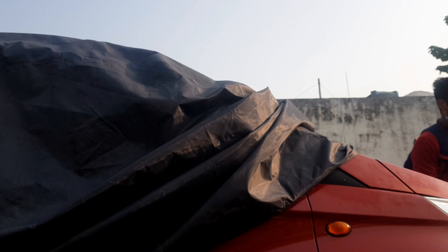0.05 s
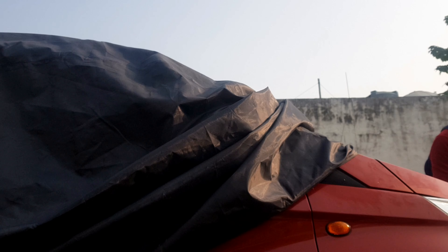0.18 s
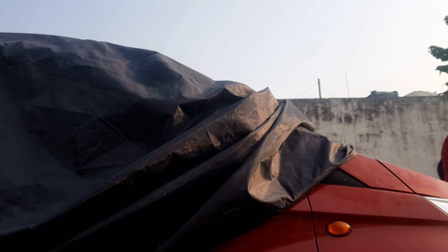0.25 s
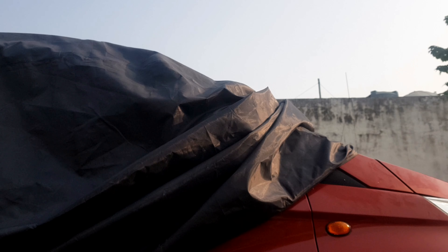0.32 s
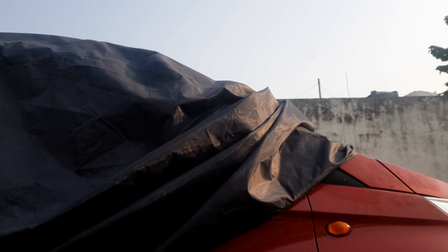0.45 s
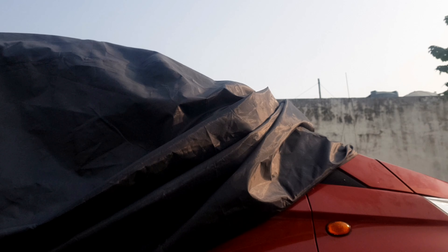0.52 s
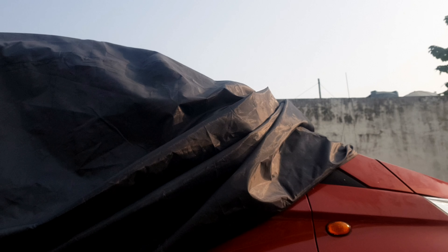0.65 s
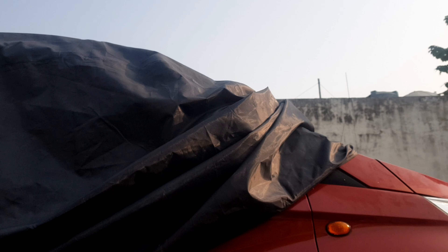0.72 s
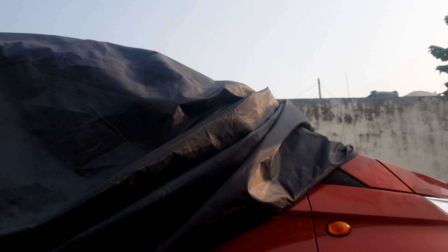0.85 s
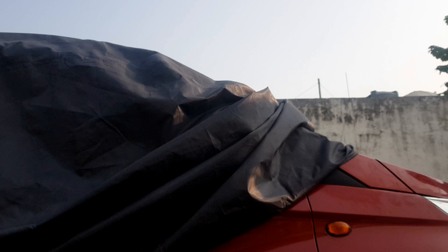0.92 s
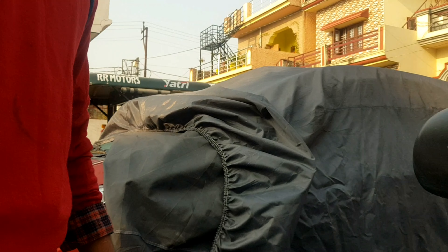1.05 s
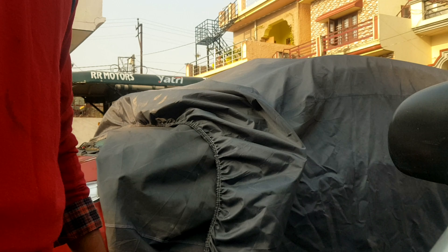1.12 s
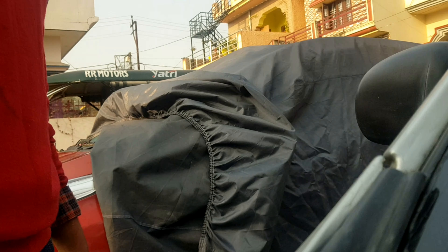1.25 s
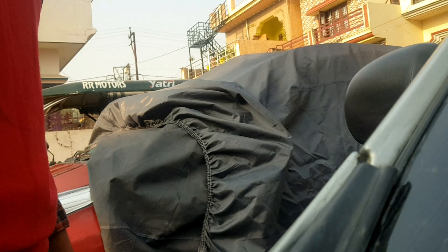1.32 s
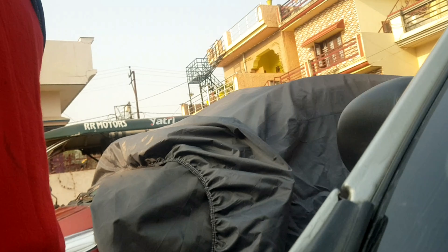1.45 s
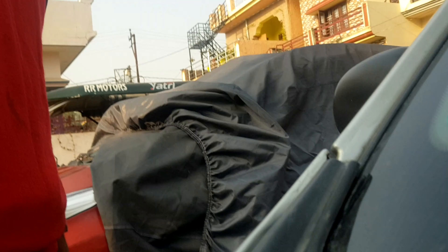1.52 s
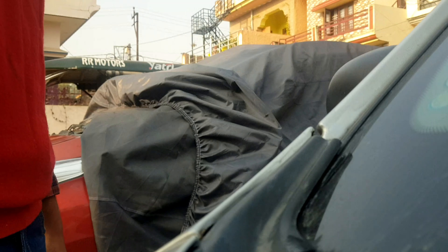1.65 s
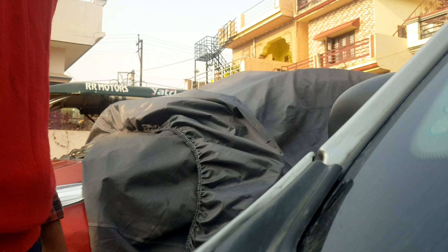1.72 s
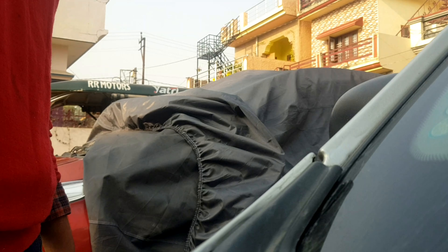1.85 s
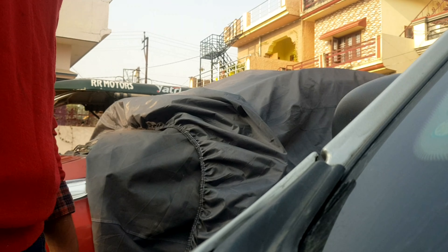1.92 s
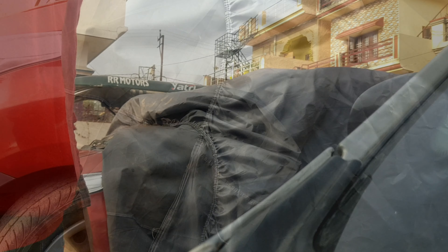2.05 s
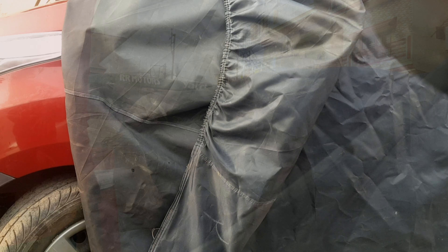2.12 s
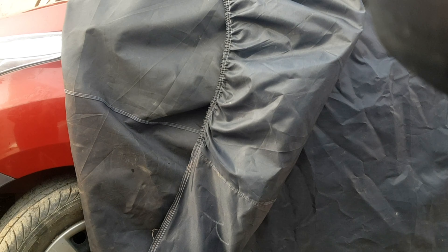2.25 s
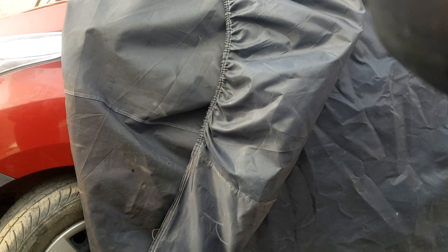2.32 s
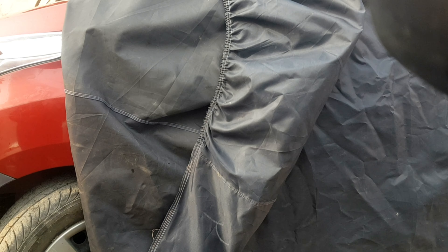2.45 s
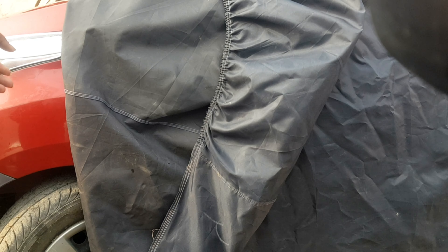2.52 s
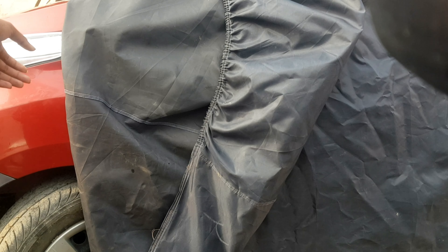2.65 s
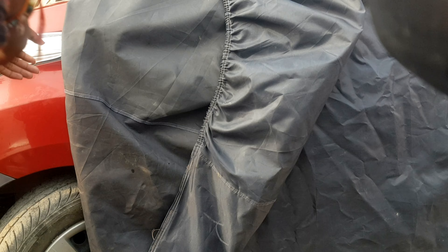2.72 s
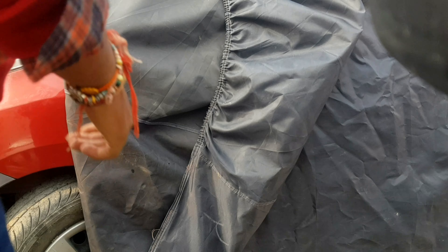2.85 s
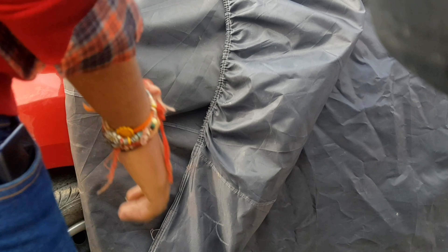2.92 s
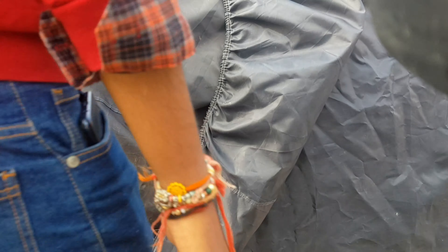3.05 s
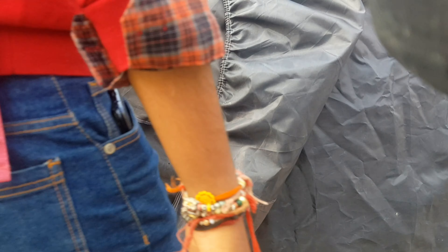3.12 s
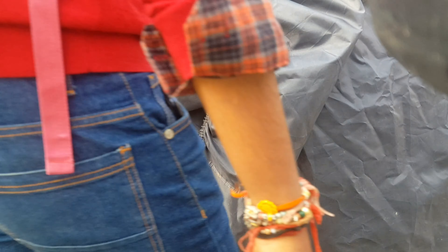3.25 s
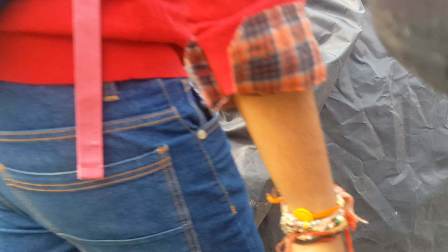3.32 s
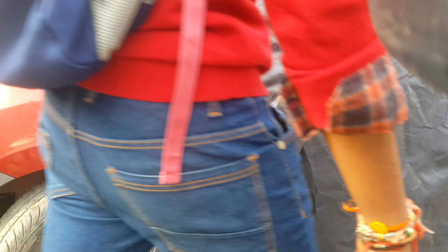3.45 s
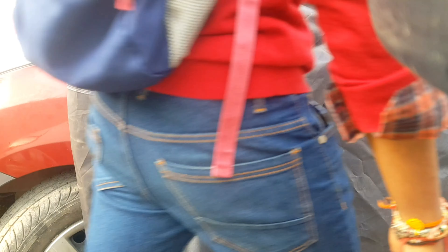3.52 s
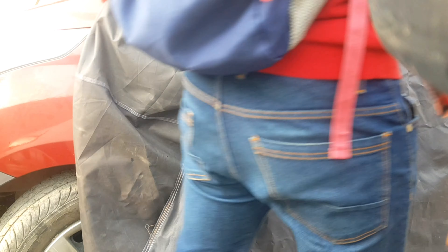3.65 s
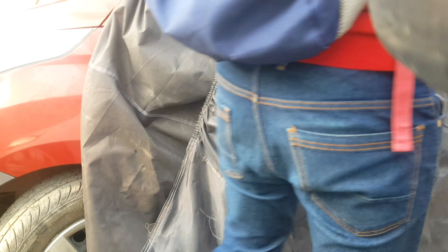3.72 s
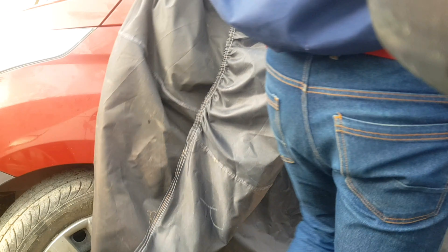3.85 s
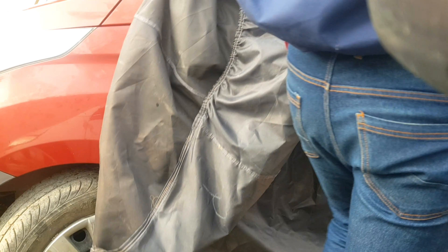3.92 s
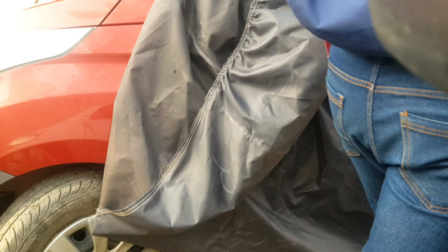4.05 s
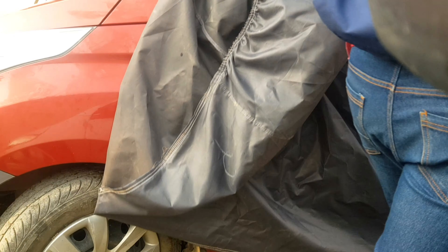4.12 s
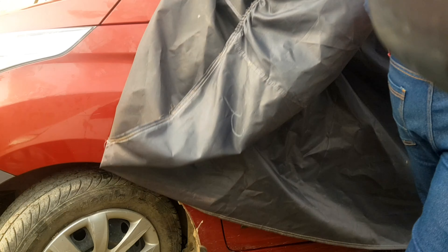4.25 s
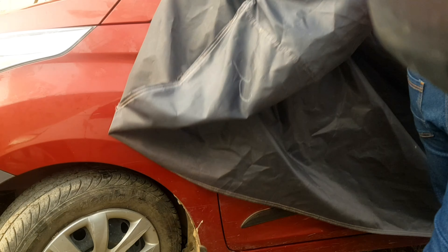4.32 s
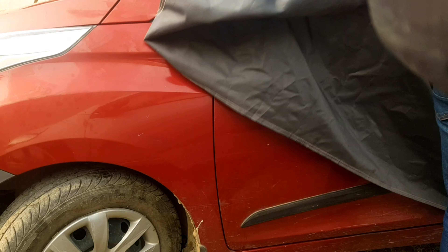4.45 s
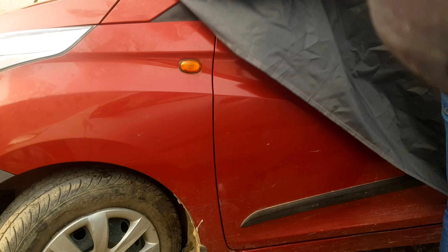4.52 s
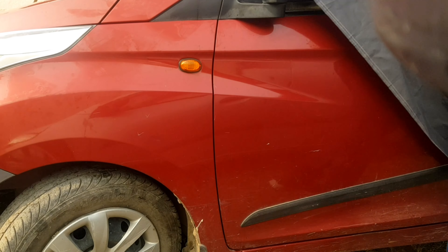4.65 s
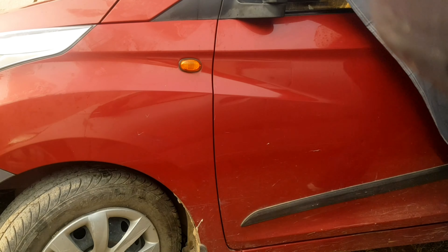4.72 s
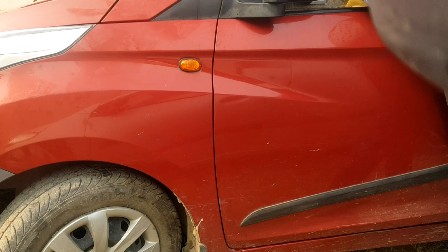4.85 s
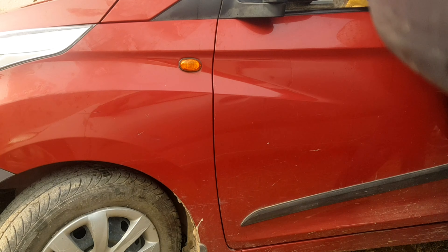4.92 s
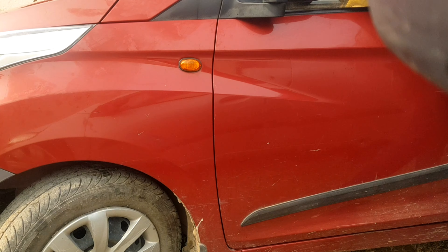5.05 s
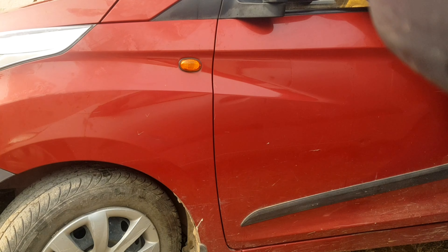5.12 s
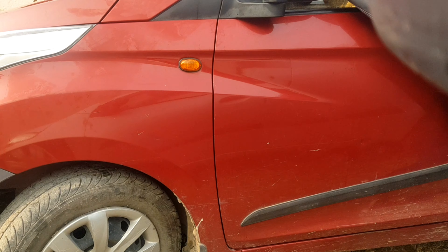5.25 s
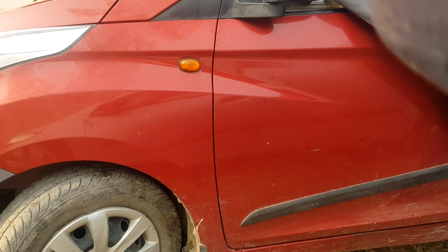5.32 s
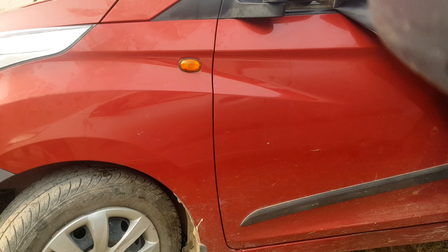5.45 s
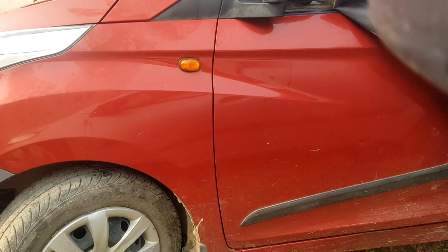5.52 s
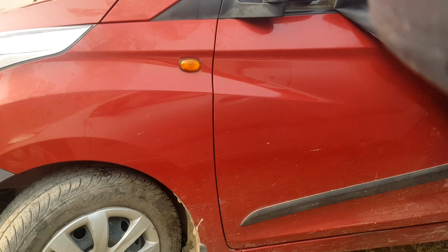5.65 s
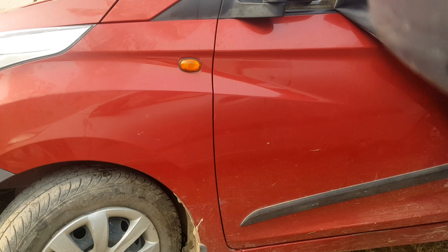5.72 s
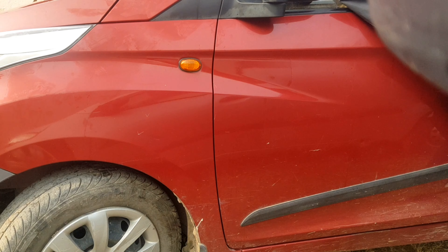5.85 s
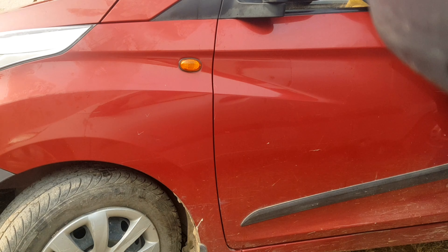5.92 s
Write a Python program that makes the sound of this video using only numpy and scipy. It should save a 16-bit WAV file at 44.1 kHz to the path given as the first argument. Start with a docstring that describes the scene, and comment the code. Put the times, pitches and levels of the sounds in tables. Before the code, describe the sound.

A stiff fabric cover rustles lightly in short tugs with a brief squeak, over soft outdoor rumble. Sharp bumps hit the camera body, ringing and clattering, then fade into a low hum. Quiet follows, with a few cloth pops and dull panel pats, before the cover is hauled off in a dense rush of hiss, crackle and snapping folds, then bundled more gently.

```python
"""A low street rumble and the hiss of cloth over paint come first, with a faint whine and far tones.
A synthetic cover is tugged, then dragged off a parked car and gathered up, close to a hand-held camera.
Shaped noise and clicks make the hiss and crackle; short damped tones make pops and squeaks of the folds.
Early on a run of hard bumps shakes the camera: pushed thuds, ringing modes, rattles and ticks.
Later, pats on the car's side set off a damped panel boom and puffs of air."""
import sys
import numpy as np
from scipy import signal
from scipy.fft import rfft, irfft, next_fast_len
from scipy.io import wavfile
from scipy.ndimage import uniform_filter1d

SR = 44100
rng = np.random.default_rng(int(sys.argv[2]) if len(sys.argv) > 2 else 0)


def digitize_waveform(pressure):
    """Quantize a signal to 16-bit integers and store it at the path in sys.argv[1].

    Rows of a 2-D input are taken as channels; values are limited to [-1, 1].
    """
    field = np.atleast_2d(pressure).T
    bounded = np.clip(field, -1, 1)
    quanta = np.round(bounded * 32767).astype(np.int16)
    wavfile.write(sys.argv[1], SR, quanta)


N = 264159  # samples

# Spectra, relative: (frequency [Hz], density [dB per Hz])
# cloth sliding, small creases, crushed large folds, billowing sheet
SLIDE_COLOUR = [(1200, 0.5), (2800, 0.5), (4500, -1), (6300, -0.5), (8200, -2.5), (10000, 0), (11600, 1),
                (13500, -2), (15500, -4.5)]
CREASE_COLOUR = [(500, -13), (1000, -2), (1400, 1), (1850, 3), (2400, -3.5), (3300, -8.5), (5000, -12),
                 (9000, -26)]
CRUSH_COLOUR = [(100, -43), (220, 0), (340, -1), (500, 0), (800, -3.3), (1100, -11), (1600, -22),
                (3000, -40), (8000, -66)]
BILLOW_COLOUR = [(40, -20), (100, 3), (160, 0), (240, -4.5), (400, -9.5), (1200, -49)]
# low rumble and far wash of the street
RUMBLE_COLOUR = [(15, -33), (30, -21.5), (50, 2), (65, 1), (95, -5.5), (130, -13), (220, -24.5), (600, -61),
                 (2000, -82)]
STREET_COLOUR = [(30, 2.5), (150, 7), (300, 1.5), (700, -1.5), (1200, -10.5), (1800, -10.5), (3000, -11),
                 (6500, -18), (8300, -35), (11500, -12), (15500, -13)]
# loose parts of the mount shaking after a bump, snap of the shell, blur around the hum
RATTLE_COLOUR = [(30, -20), (70, 19.5), (250, 13), (450, 1.5), (750, -14.5), (1000, -12.5), (1400, -26),
                 (2200, -22), (4000, -41.5), (8000, -69)]
TICK_COLOUR = [(400, -5), (1400, 18), (2500, 5), (4000, 0), (5500, -7.5), (8500, -7), (12000, 0),
               (15500, -7)]
HUM_COLOUR = [(150, -10), (300, 0), (360, -5), (470, -3), (700, -22), (2000, -60)]
# colour of a crumple around its pitch: (multiple of the pitch [ratio], density [dB per Hz])
CRUMPLE_COLOUR = [(.2, -22), (.45, -7), (.75, 0), (1.3, 0), (1.8, -10), (3.5, -17), (8, -32)]
# likeness of left and right, close by and spread out: (frequency [Hz], correlation [-1 to 1])
NEAR_LIKENESS = [(60, 0.95), (200, 0.85), (400, 0.78), (700, 0.42), (1000, 0.53), (1400, -0.34),
                 (2800, -0.013), (6000, 0.019)]
WIDE_LIKENESS = [(60, 1), (170, 0.61), (350, .5), (650, -0.2), (1200, -0.69), (1800, -0.48), (2600, 0.18),
                 (4000, -0.011)]

# puffs of air on the microphones:
# (peak time [s], rise over 20 dB [s], fall over 20 dB [s], level [dB])
GUSTS = [(0.15, .3, 0.1, -55), (0.5, 0.4, .5, -51), (0.88, 0.1, 0.2, -49.5), (1.19, 0.12, 0.32, -42.5),
         (1.87, 0.3, .15, -49), (3.26, 0.07, 0.2, -50), (3.8, 1.5, 2.5, -54.5), (4.84, .8, .35, -47.5),
         (5.14, 1.2, 0.1, -55), (5.26, .1, .08, -55), (5.93, .16, 3, -51)]
# partials of a faint far drone: (frequency [Hz], width [Hz], relative level [dB])
DRONE = [(520, 50, -15), (678, 49, -8), (960, 60, -11), (1195, 60, -8.5), (1400, 50, -11), (1540, 40, -15)]
# loudness of the drone: (time [s], level [dB])
DRONE_LEVEL = [(0, -65), (.2, -63), (.45, -68), (.7, -64), (.95, -72), (1.5, -77.5), (2.9, -88),
               (5.99, -73)]
# loudness of the whine: (time [s], level [dB])
WHINE_LEVEL = [(0, -79), (.9, -80), (1.2, -73), (1.3, -81), (1.5, -87), (2.1, -93), (2.4, -80), (2.88, -77),
               (3.05, -88), (5.99, -90)]
# far tones that come and go: (middle time [s], length [s], pitch [Hz], level [dB])
FAR_TONES = [(0.22, .13, 1185, -62), (0.52, .18, 1210, -67), (0.68, .34, 695, -61.5)]

# short tugs at the cover: (time up to speed [s], rise over 20 dB [s], hold [s], fall over 20 dB [s],
#  hiss [dB], crease [dB], crush [dB])
TUGS = [(0.135, .12, 0.042, .2, -63.5, -63, -61), (0.25, .1, .08, .28, -69, -71, -69),
        (0.49, .09, .02, .25, -65, -74, -66), (0.58, 0.12, 0.05, 0.26, -63, -65, -64.5),
        (0.68, 0.09, 0.028, 0.1249, -53.5, -59.5, -67), (0.75, 0.06, 0.037, 0.2152, -51.5, -56.5, -58.5),
        (0.92, 0.4, .25, .4, -67.5, -72, -76), (2.37, 0.17, 0.045, .5, -61.5, -73, -75),
        (2.88, 0.18, 0.11, 0.26, -64, -77, -83), (3.22, .13, 0.098, .14, -62.5, -79, -59.5),
        (3.43, .07, 0.083, 0.3, -65, -74.5, -60.5), (3.529, .08, 0.06, .25, -66, -68, -55),
        (4.41, 0.04, 0.055, .15, -57.5, -61, -47), (4.64, .08, .15, 0.05, -58.5, -66, -50),
        (4.917, .035, .012, .045, -72, -70, -51.5), (5.17, .1, .11, .27, -67, -64, -55),
        (5.555, 0.13, .025, .11, -61, -60, -55.5), (5.92, 0.33, .08, .5, -59.5, -61.5, -54)]
# long haul that takes the cover off, then its trailing end: (time [s], cloth speed [dB])
HAUL = [(3.55, -31.5), (3.66, -19.5), (3.82, -7), (3.95, -10), (4.17, -8.8), (4.29, -5.2), (4.49, -0.8),
        (4.79, -8.5), (4.84, -15), (4.98, -21), (5.6, -21.5), (5.75, -25.5), (5.99, -23)]
# cloth catching and squeaking as it slides: (middle time [s], length [s], middle pitch [Hz],
#  glide [octaves per s], unsteadiness [0-1], level [dB])
SQUEAKS = [(0.714, 0.056, 1850, 5, .09, -48), (1.13, 0.11, 3490, -0.5, .1, -66),
           (2.897, .1, 630, -.6, .12, -61), (2.96, 0.11, 1800, 2, .13, -68)]
# folds that buckle with a pop: (time [s], level [dB], pitch [Hz], ring t60 [s], relative crackle [dB])
POPS = [(0.7494, -37.5, 1700, 0.004, -1), (1.125, -61, 887, 0.1, -14), (2.038, -56.5, 596, 0.033, -17),
        (2.115, -55.5, 800, 0.012, -9), (2.6925, -43, 1120, 0.018, -22), (2.7155, -53, 1170, 0.016, -20),
        (3.148, -48.5, 700, 0.06, -17), (3.162, -56, 1800, 0.012, -1), (3.228, -40.5, 760, 0.024, -17),
        (3.491, -46, 1500, 0.014, -9), (3.7745, -27, 583, 0.034, -35), (3.818, -43, 1300, 0.02, -5),
        (3.831, -37, 1100, .012, -12), (3.839, -37, 900, .008, -14), (3.888, -37, 480, .012, -20),
        (3.986, -42, 1500, .01, -8), (4.058, -37, 800, .012, -10), (4.2295, -36, 900, 0.014, -12),
        (4.36, -36, 1900, .012, -12), (4.443, -31, 540, .01, -20), (4.396, -24, 580, 0.0093, -14),
        (4.473, -32, 600, 0.023, -8), (4.487, -30, 700, .012, -15), (4.54, -28, 850, 0.012, -13),
        (4.611, -33, 600, .01, -16), (4.643, -30.5, 650, 0.01, -14), (4.672, -35, 540, .014, -18),
        (4.725, -38, 1700, .008, -6), (4.756, -34, 920, .012, -16), (4.777, -35, 520, .01, -18),
        (4.809, -34, 500, 0.017, -15), (5.166, -40, 1800, 0.016, -7), (5.19, -41, 1150, 0.014, -14),
        (5.257, -45, 700, .024, -12), (5.51, -35.5, 520, 0.017, -21), (5.521, -36, 800, .016, -22),
        (5.5415, -30, 470, 0.026, -21), (5.5675, -42, 2900, .006, -3), (5.812, -45, 800, 0.022, -19),
        (5.911, -42, 700, .02, -17)]
# handfuls of cloth crumpling or scraping: (start time [s], length [s], pitch [Hz], level [dB])
CRUMPLES = [(1.118, .05, 750, -62), (2.692, .05, 1050, -66), (3.806, .055, 1100, -50.5),
            (3.885, .035, 1500, -58), (3.975, .03, 1500, -57), (4.04, .04, 1500, -57),
            (4.222, .09, 1200, -54.5), (4.28, .14, 1700, -54), (4.46, .06, 600, -46),
            (4.51, .08, 2000, -56), (4.625, .035, 1100, -51), (4.803, .035, 1500, -57),
            (4.84, .12, 1600, -64), (5.162, .04, 1000, -55)]

# bumps on the camera, part levels relative to the bump and before trims: (time [s], left [dB], right [dB],
#  thud corner [Hz], rattle [dB], ring pitch [Hz], ring [dB], clack pitch [Hz], clack [dB], tick [dB])
KNOCKS = [(1.266, -50, -37.5, 141.7, -22, 202, -17, 600, -44, -59),
          (1.3903, -16, -5, 190, -19, 228, -19, 850, -10, -36),
          (1.398, -11, -5, 149, -19, 198, -27, 776, -21, -48),
          (1.4117, -34, -33, 135, -26, 480, 0, 670, -36, -42),
          (1.4767, -32, -31, 91, -22, 251, -30, 880, -18, -40),
          (1.6441, -36, -45, 70, -35, 85, -20, 480, -43, -60),
          (1.6875, -34, -52, 440, -4, 226, -31, 2435, -6, -18),
          (1.6989, -5, -18, 246, -16, 347, -39, 1394, -17, -26),
          (1.7096, -20, -25, 84, -18, 127, -18, 1700, -21, -33),
          (1.7196, -29, -35, 159, -16, 359, -10, 1177, -6, -21),
          (1.7413, -30, -40, 98, -20, 140, -6, 1170, -42, -50),
          (1.7586, -37, -50, 210, -6, 400, -2, 600, -30, -50),
          (1.7786, -14, -19, 244, -18, 184, -36, 688, -9, -41),
          (1.7861, -17, -23, 98, -41, 140, -36, 504, -44, -60),
          (1.875, -37, -41, 110, -21, 307, -25, 700, -16, -52)]
# what the camera and its mount ring with: (frequency [Hz], relative level [dB], t60 [s])
MOUNT = [(160, 16.5, 0.1), (215, -0.5, 0.23), (261.6, 3.5, 0.12), (307, 0, 0.23), (415, -3.5, 0.15),
         (479, -6, 0.11), (610, 5, 0.011), (860, 0, 0.017), (1146, 4.5, 0.018), (1400, 4.5, 0.016),
         (1730, 0, 0.024), (2500, 5, .008), (3700, -18, .012)]
# hands meeting the car's side through the cover: (time [s], boom [dB], puff of air [dB])
PATS = [(3.158, -40, -45.5), (3.23, -50, -58), (3.429, -42, -52.5), (3.7755, -40, -58), (5.5415, -48, -60)]
# what the side panel rings with: (frequency [Hz], relative level [dB], t60 [s])
PANEL = [(128, -2, 0.16), (269, -16, 0.075), (344.5, 3, 0.14), (470, -4, 0.094), (575, -3, 0.086),
         (700, -16, .06)]

RUMBLE_DB, RUMBLE_WANDER_DB = -61.5, 2
# how each layer answers the haul: (level at 0 dB speed [dB], slope [dB per dB of speed])
HAUL_HISS, HAUL_CREASE, HAUL_CRUSH, HAUL_BILLOW = (-54.5, 0.47), (-49.5, 1.2), (-41.6, 0.98), (-47, 1.0)
BILLOW_LAG_S = 0.15  # the loose sheet swings after the pull
JERKS_PER_S, JERK_SIZE, JERK_DECAY_S = 140, 0.4, 0.003
TICK_LAG_S = 0.0018  # the shell snaps just after the push
HUM_S, HUM_HZ, HUM_DB, HUM_FALL_S, HUM_BLUR_DB = 1.897, 307, -56.5, 0.13, -8
EDGE_HZ = 15650


def gain_of(db):
    """Amplitude factor for a level in dB."""
    return np.exp(np.asarray(db) * (np.log(10) / 20))


def evened(x):
    """Brings a signal to rms 1."""
    return x / np.sqrt(np.mean(x ** 2) + 1e-20)


def read(points, hz):
    """A spectrum joined by straight lines on a log-frequency axis."""
    f, value = np.transpose(points)
    return np.interp(np.log(hz + 1), np.log(f), value)


def follow(rows, axis=1):
    """One column of a control curve at every sample."""
    rows = np.asarray(rows)
    return np.interp(np.arange(N) / SR, rows[:, 0], rows[:, axis])


def panned(db):
    """Left and right gains averaging 1; positive dB favours the left."""
    sides = gain_of(np.array([[0.5], [-0.5]]) * db)
    return sides / sides.mean(0)


def add(mix, s, sound):
    """Lays a stereo sound into the mix at a time in seconds."""
    part = mix[:, max(round(s * SR), 0):][:, :sound.shape[1]]
    part += sound[:, :part.shape[1]]


def coloured(pair, colour, likeness):
    """Gives two unrelated signals a spectrum and a left-right likeness; their middle has rms 1."""
    length = pair.shape[1]
    size = next_fast_len(length)
    spectra, hz = rfft(pair, size), np.fft.rfftfreq(size, 1 / SR)
    same = np.clip(read(likeness, hz), -0.99, 0.99)
    mid = spectra[0] * np.sqrt(1 + same)
    side = spectra[1] * np.sqrt(1 - same)
    out = irfft(np.array([mid + side, mid - side]) * gain_of(read(colour, hz)), size)[:, :length]
    return out / out.mean(0).std()


def noise(size=N):
    """Unrelated white noise left and right."""
    return rng.standard_normal((2, size))


def drift(hz):
    """Slow random wander of rms 1, low-passed around a given rate."""
    per_s = 1000  # control points per second
    slow = rng.standard_normal(N * per_s // SR + 2)
    lowpass = 1 + (np.fft.rfftfreq(len(slow), 1 / per_s) / hz) ** 2
    slow = irfft(rfft(slow) / lowpass, len(slow))
    return np.interp(np.arange(N) * per_s / SR, np.arange(len(slow)), evened(slow))


def swell(start_s, rise_s, fall_s, hold_s=0):
    """Gain of a movement that gathers speed, holds it and dies away."""
    t = np.arange(N) / SR - start_s
    away = np.maximum(-t / rise_s, (t - hold_s) / fall_s)
    return gain_of(-20 * np.clip(away, 0, 10))


def street():
    """Low rumble lifted by puffs of air, a far wash with a drone in it, and a thin wavering whine."""
    air_power = gain_of(RUMBLE_DB + RUMBLE_WANDER_DB * drift(hz=5)) ** 2
    for s, rise_s, fall_s, db in GUSTS:
        air_power = air_power + (gain_of(db) * swell(s, rise_s, fall_s)) ** 2
    rumble = coloured(noise(), RUMBLE_COLOUR, NEAR_LIKENESS) * np.sqrt(air_power) * panned(db=-2.0)
    wash = coloured(noise(), STREET_COLOUR, WIDE_LIKENESS) * gain_of(-70.5)
    drone = np.zeros(N)
    for hz, width, db in DRONE:
        # wandering loudness and pitch widen each partial
        loudness = gain_of(db) * drift(width / 2)
        drone += loudness * np.sin(2 * np.pi * np.cumsum(hz + width / 2 * drift(width)) / SR)
    whine_hz = 1718 + 8 * drift(hz=30)
    whine = np.sin(2 * np.pi * np.cumsum(whine_hz) / SR) * gain_of(1.5 * drift(hz=20))
    whine = whine * gain_of(follow(WHINE_LEVEL))
    return rumble + wash + whine + drone * gain_of(follow(DRONE_LEVEL)) * panned(db=-19)


def snaps(per_s, spread_db, rub, clump_db, clump_hz):
    """Tiny buckling clicks of uneven size over smooth rubbing, both swelling in clumps."""
    size = gain_of(spread_db * np.minimum(rng.exponential(1, (2, N)), 4))
    clicks = size * np.sign(noise()) * (rng.random((2, N)) < per_s / SR)
    return (evened(clicks) + rub * noise()) * gain_of(clump_db * drift(clump_hz))


def crinkles(per_s, spread_db, cycles, low_hz, high_hz):
    """Facets of stiff cloth, each ringing briefly at its own pitch when it flips."""
    out, t = np.zeros((2, N)), np.arange(SR // 30) / SR
    flips = rng.random((SR // 4, 4))[:int(per_s * N / SR)]
    for when, pitch, strength, angle in flips:
        hz = low_hz * (high_hz / low_hz) ** pitch
        facet = np.sin(2 * np.pi * hz * t) * np.exp(-t * hz / cycles) * (1 - np.exp(-2 * t * hz))
        gain = hz * gain_of(spread_db * min(-np.log(strength), 3))
        sides = [np.cos(2 * np.pi * angle), np.sin(2 * np.pi * angle)]
        add(out, when * N / SR, gain * np.outer(sides, facet))
    return evened(out)


def efforts():
    """Gains of hiss, creases, crushed folds and billowing: the tugs and the haul add in power."""
    speed_db, t = follow(HAUL), np.arange(N) / SR
    answers = (HAUL_HISS, HAUL_CREASE, HAUL_CRUSH, HAUL_BILLOW)
    hauling = np.clip((t - HAUL[0][0]) / 0.1, 0, 1)
    hiss, crease, crush, billow = (gain_of(db + slope * speed_db) ** 2 * hauling for db, slope in answers)
    crush_power = 1.36  # large folds give way only near the height of a tug
    for s, rise_s, hold_s, fall_s, hiss_db, crease_db, crush_db in TUGS:
        speed = swell(s, rise_s, fall_s, hold_s)
        hiss = hiss + (gain_of(hiss_db) * speed) ** 2
        crease = crease + (gain_of(crease_db) * speed) ** 2
        crush = crush + (gain_of(crush_db) * speed ** crush_power) ** 2
    late_billow = np.interp(t - BILLOW_LAG_S, t, billow)
    return np.sqrt([hiss, crease, crush, late_billow])


def jerks():
    """Cloth sticks and lets go: each slip lifts crackle and crunch together for a few milliseconds."""
    slips = np.minimum(rng.exponential(1, N), 2.5) * (rng.random(N) < JERKS_PER_S / SR)
    decay = np.exp(-1 / (JERK_DECAY_S * SR))
    return evened(1 + JERK_SIZE * signal.lfilter([1], [1, -decay], slips))


def cloth():
    """The weave hisses, small creases crackle, large folds crunch and the sheet billows."""
    weave = snaps(per_s=6000, spread_db=5.5, rub=1.8, clump_db=0.8, clump_hz=60)
    creases = snaps(per_s=1200, spread_db=3.0, rub=0.77, clump_db=1.6, clump_hz=60)
    creases += gain_of(-5.5) * crinkles(per_s=260, spread_db=1.3, cycles=17.0, low_hz=1008, high_hz=4857)
    folds = snaps(per_s=500, spread_db=2.2, rub=0.65, clump_db=1.4, clump_hz=40)
    folds += gain_of(-13) * crinkles(per_s=220, spread_db=1.5, cycles=3.7, low_hz=260.4, high_hz=1300)
    hiss = coloured(weave, SLIDE_COLOUR, WIDE_LIKENESS)
    crackle = coloured(creases, CREASE_COLOUR, NEAR_LIKENESS)
    crunch = coloured(folds, CRUSH_COLOUR, NEAR_LIKENESS)
    billow = coloured(noise(), BILLOW_COLOUR, NEAR_LIKENESS)
    hiss_gain, crease_gain, crush_gain, billow_gain = efforts()
    slip = jerks()
    return (hiss * hiss_gain * panned(db=-4.3)
            + slip * crackle * crease_gain * panned(db=-1.5)
            + slip * crunch * crush_gain * panned(db=-3.2)
            + billow * billow_gain * panned(db=-1.5))


def far_tones():
    """Distant pitched sounds, blurred by the walls along the street: the pitch wanders quickly."""
    out = np.zeros((2, N))
    for s, length, hz, db in FAR_TONES:
        size = round(length * SR)
        turns = np.cumsum(hz + 28 * drift(hz=70)[:size]) / SR
        tone = np.hanning(size) * np.sin(2 * np.pi * turns)
        add(out, s - length / 2, gain_of(db) * tone * panned(db=-6))
    return out


def squeaks():
    """The weave skips over an edge at a gliding, unsteady rate."""
    out = np.zeros((2, N))
    for s, length, hz, glide, unsteady, db in SQUEAKS:
        t = np.arange(-length / 2, length / 2, 1 / SR)
        jitter = evened(uniform_filter1d(noise(SR // 4), size=60, axis=1))[:, :len(t)]
        turns = np.cumsum(hz * 2 ** (glide * t) * (1 + unsteady * jitter), axis=1) / SR
        add(out, s - length / 2, gain_of(db) * np.hanning(len(t)) * np.sin(2 * np.pi * turns))
    return out * panned(db=-4)


def pops():
    """A taut fold flips over: a few damped cycles, with a crackle and a flutter of the cloth around it."""
    out, t = np.zeros((2, N)), np.arange(SR // 6) / SR
    crackle_colour = CREASE_COLOUR[:4] + [(5000, -21.5), (15000, -24)]
    for s, db, hz, t60, crackle_db in POPS:
        flip = np.sin(2 * np.pi * hz * t) * gain_of(-60 * t / t60) * (1 - np.exp(-t * hz * 2))
        flutter_colour = [(hz / 4, -18), (hz, 0), (hz * 3, -24), (hz * 10, -55)]
        flutter = coloured(noise(len(t)), flutter_colour, NEAR_LIKENESS) * gain_of(-12 - 60 * t / (3 * t60))
        crackle = coloured(noise(len(t)), crackle_colour, NEAR_LIKENESS)
        crackle = crackle * gain_of(crackle_db - 60 * t / 0.012)
        add(out, s, gain_of(db) * (flip + flutter + crackle))
    return out * panned(db=-4.5)


def crumples():
    """A handful of folds gives way in a quick run of snaps that builds fast and thins out."""
    out = np.zeros((2, N))
    grain = snaps(per_s=900, spread_db=2.8, rub=0.4, clump_db=1.2, clump_hz=80)
    for s, length, hz, db in CRUMPLES:
        run = grain[:, round(s * SR):round((s + length) * SR)]
        colour = [(hz * multiple, level) for multiple, level in CRUMPLE_COLOUR]
        run = coloured(run, colour, NEAR_LIKENESS)
        shape = np.sin(np.pi * np.linspace(0, 1, run.shape[1]) ** 0.65)
        add(out, s, gain_of(db) * run * shape)
    return out * panned(db=-2.2)


def thud(t, hz, softness=5.53, contact_hz=2200):
    """Acceleration of a body given one short push: a brief swing, its edge rounded by soft contact."""
    jf = 1j * np.fft.rfftfreq(len(t), 1 / SR)
    response = (jf / hz) ** 2 / (1 + jf / hz) ** softness / (1 + jf / contact_hz) ** 2
    swing = irfft(rfft(t == 0) * response, len(t))
    return swing / abs(swing).max()


def rings(t, hz, octaves, rise):
    """The modes of the mount, those near a given pitch struck hardest."""
    modes = np.zeros(len(t))
    for f, db, t60 in MOUNT:
        nearness = 1 / (1 + (np.log2(f / hz) / octaves) ** 4)
        modes += gain_of(db - 60 * t / t60) * np.sin(2 * np.pi * f * t) * nearness
    return modes * (1 - np.exp(-(t / rise) ** 2))


def knocks():
    """Bumps travel through the camera body and push its two microphones in opposite directions."""
    out, t = np.zeros((2, N)), np.arange(12000) / SR
    opposed = [(50, -0.45), (250, -0.16), (550, 0.5), (1500, 0.11)]  # (frequency [Hz], correlation)
    lag_s = 0.00032  # the shock reaches the right microphone a little later
    attack = 1 - np.exp(-t / 0.0003)
    for s, left_db, right_db, hz, rattle_db, ring_hz, ring_db, clack_hz, clack_db, tick_db in KNOCKS:
        sides = gain_of([[left_db], [right_db]])
        body = thud(t, hz) + gain_of(ring_db) * rings(t, ring_hz, octaves=0.56, rise=0.0032)
        body = sides * np.array([body, -np.interp(t - lag_s, t, body)])
        # the shell's clack arrives through the air
        clack = gain_of(clack_db) * rings(t, clack_hz, octaves=0.31, rise=0.0011)
        clack = clack * panned(db=7) * sides.mean()
        rattle = coloured(noise(len(t)), RATTLE_COLOUR, opposed) * attack
        rattle = rattle * (np.exp(-t / 0.0075) + 0.25 * np.exp(-t / 0.053))
        rattle = np.sqrt(sides * sides.mean()) * gain_of(rattle_db - 1.5) * rattle
        tick = coloured(noise(len(t)), TICK_COLOUR, WIDE_LIKENESS) * attack
        tick = tick * (np.exp(-t / 0.0011) + 0.05 * np.exp(-t / 0.032))
        add(out, s + TICK_LAG_S, gain_of(tick_db + 4) * tick * panned(db=-1.5) * sides.mean())
        add(out, s, body + rattle + clack)
    return out + low_hum()


def low_hum():
    """A low hum swells around the last soft bump, holds briefly and dies away: a wavering tone in noise."""
    tone = np.sin(2 * np.pi * np.cumsum(HUM_HZ + 3 * drift(hz=30)) / SR)
    hum = tone + gain_of(HUM_BLUR_DB) * coloured(noise(), HUM_COLOUR, NEAR_LIKENESS)
    hum = hum * gain_of(HUM_DB) * swell(HUM_S, rise_s=0.089, fall_s=HUM_FALL_S, hold_s=0.088)
    return hum * gain_of([[2], [-5]])  # left, right [dB]


def pats():
    """The steel panel answers each touch with a cloth-damped boom; air puffs out from under the cover."""
    out, t = np.zeros((2, N)), np.arange(SR // 2) / SR
    boom = sum(gain_of(db - 60 * t / t60) * np.sin(2 * np.pi * hz * t) for hz, db, t60 in PANEL)
    boom = boom * (1 - np.exp(-t / 0.0026))
    for s, db, puff_db in PATS:
        puff = coloured(noise(len(t)), BILLOW_COLOUR, NEAR_LIKENESS)
        puff = puff * gain_of(puff_db - 60 * t / 0.58) * (1 - np.exp(-t / 0.008))
        add(out, s, (gain_of(db) * boom + puff) * panned(db=-3.5))
    return out


def scene():
    """All layers together, in order of first appearance."""
    return street() + cloth() + far_tones() + squeaks() + pops() + crumples() + knocks() + pats()


def record(dry):
    """The recorder's band limit: a steep low-pass."""
    lowpass = signal.firwin(511, EDGE_HZ, window=("kaiser", 8), fs=SR)
    return signal.oaconvolve(dry, lowpass[None], "same")


dry = scene()
out = record(dry)
digitize_waveform(out)
```